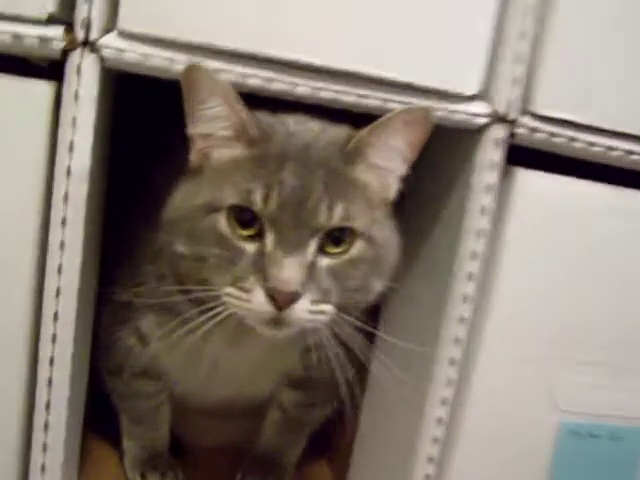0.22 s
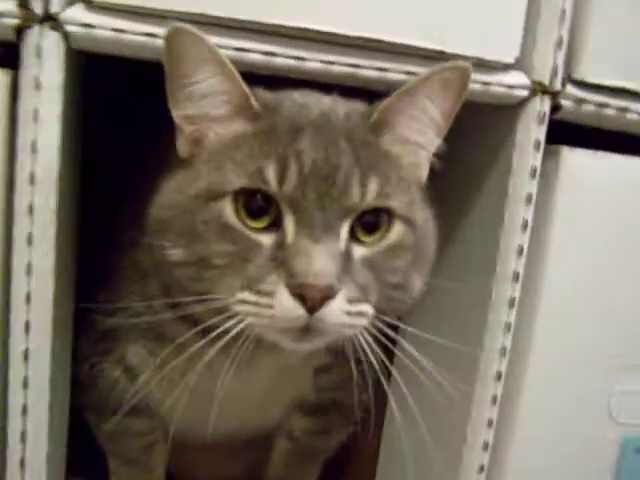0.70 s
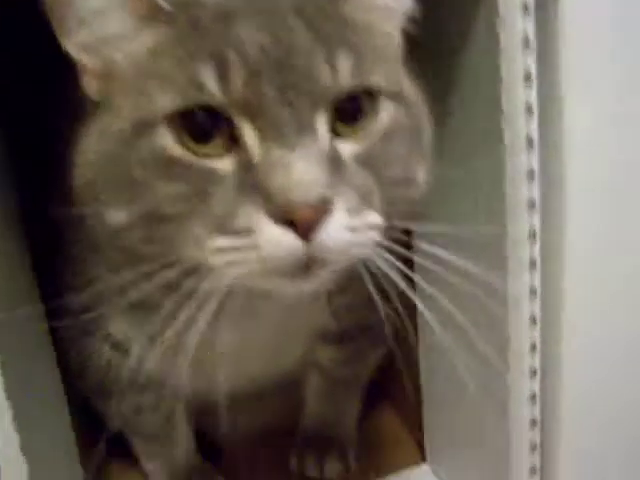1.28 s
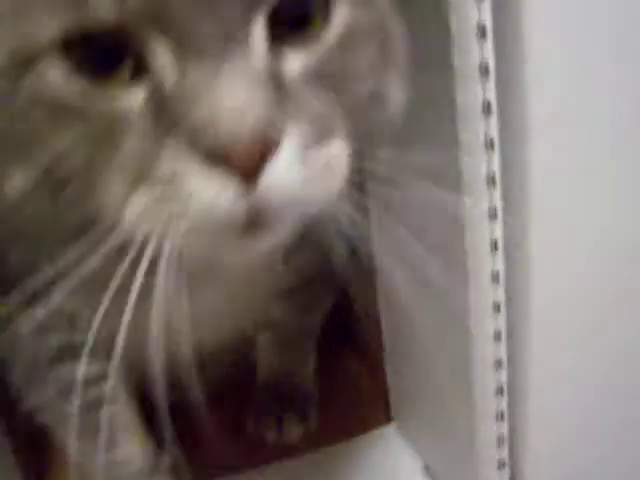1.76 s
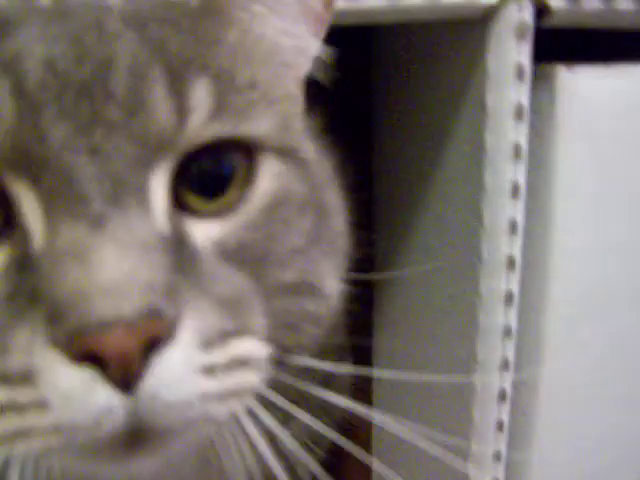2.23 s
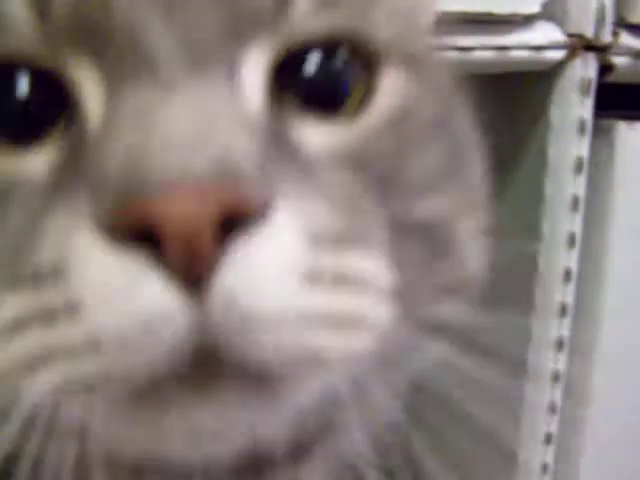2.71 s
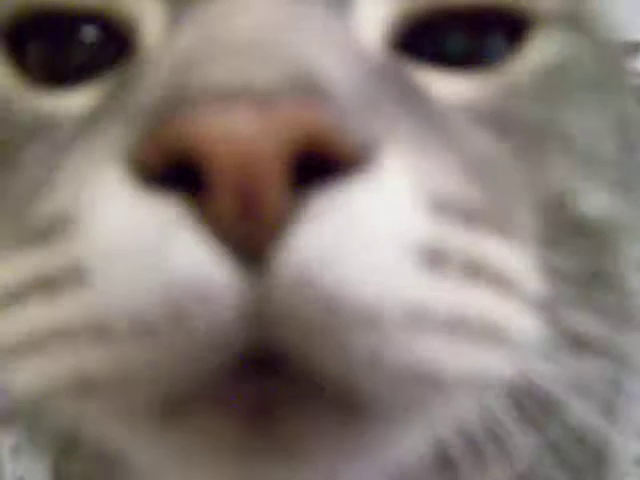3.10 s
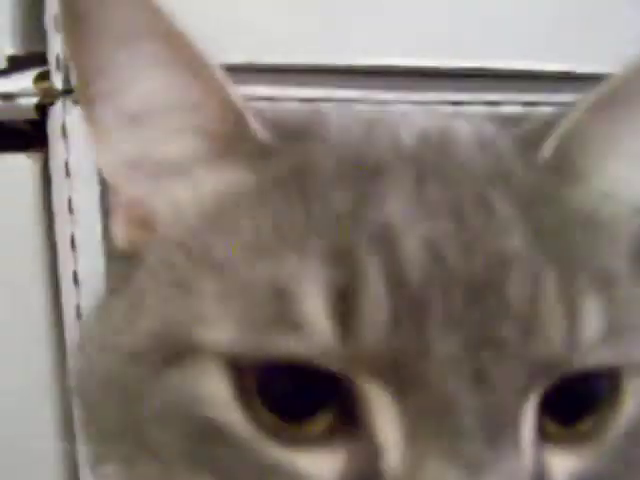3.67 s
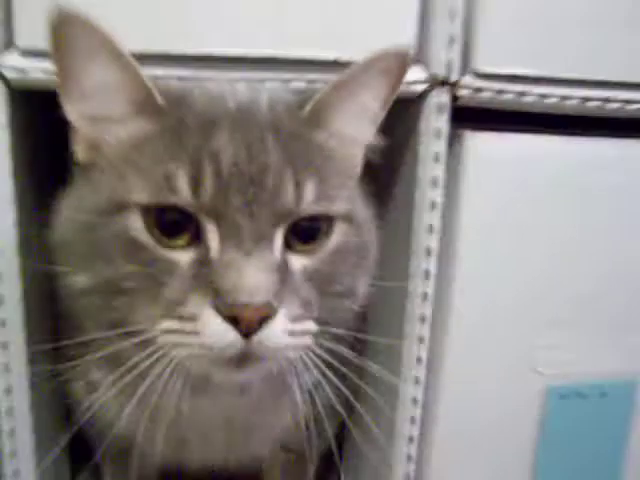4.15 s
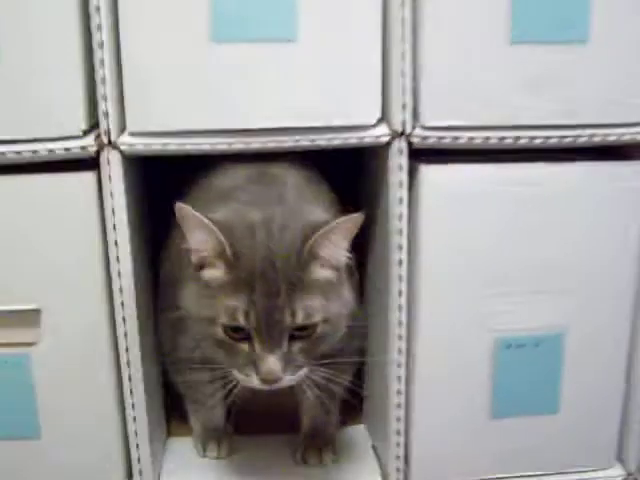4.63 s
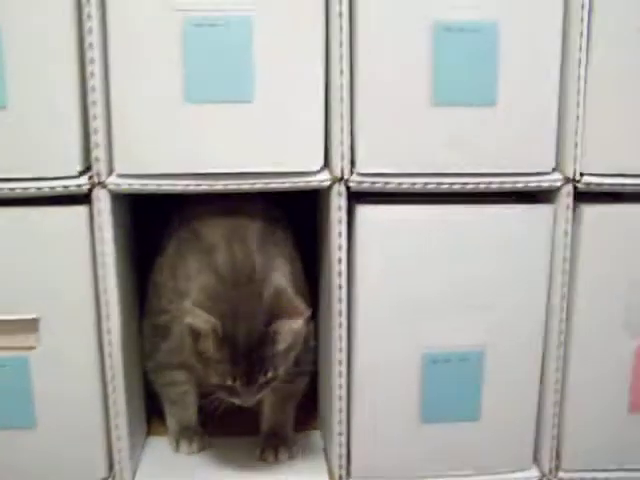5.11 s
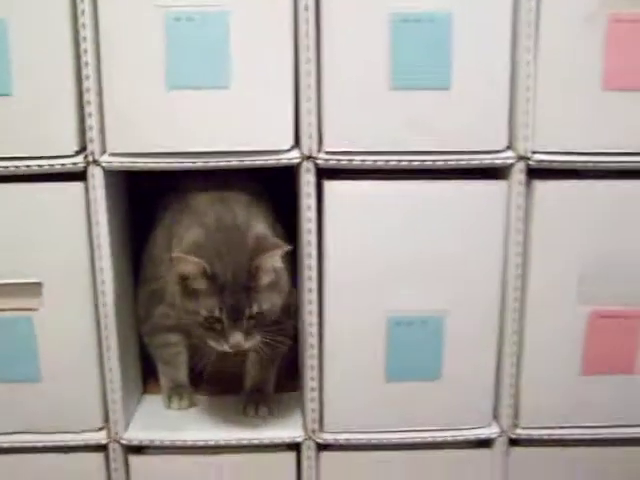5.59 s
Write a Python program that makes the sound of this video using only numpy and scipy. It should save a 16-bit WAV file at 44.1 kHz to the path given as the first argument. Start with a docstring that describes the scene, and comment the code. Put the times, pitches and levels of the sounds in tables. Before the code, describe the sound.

Scattered light taps, knocks and brief scratches on cardboard come from a cat shifting in a box, close to the microphone indoors. A hollow, crackly paw step is followed by a lull, then the cat's side slides softly along the wall and its paws tap and step on the flap. Plastic clicks and bumps from handling the camera break in now and then, with faint hiss and hum underneath.

```python
"""Small room, a stack of cardboard boxes: a cat shifts about in one, close to a hand-held camera.
Paws drive the modes of the floor and front flap; the card crackles and stiff edges knock.
Claws tap and drag, fur swishes, the flank rubs a wall: fibres catch and slip, and the panel booms.
The camera body ticks and bumps in the hand. Faint hum and hiss underneath."""
import sys
import numpy as np
from scipy import signal
from scipy.fft import rfft, irfft
from scipy.io import wavfile

SR = 44100
rng = np.random.default_rng(int(sys.argv[2]) if len(sys.argv) > 2 else 0)


def transcribe(u):
    """Save the signal u as a 16-bit wav file named by the first command-line argument.

    u: samples, shape (n,) or (channels, n), limited to [-1, 1]; the rate is SR.
    q: integer samples, one column per channel.
    """
    v = np.clip(np.atleast_2d(u).T, -1, 1)
    q = np.round(v * 32767).astype(np.int16)
    wavfile.write(sys.argv[1], SR, q)


N = 258822
T = np.arange(N) / SR
AGE = T[:SR // 3]  # time since contact, s

# box wall boom spectrum: f/Hz, level/dB
WALL_BOOM = [(100, -30.5), (170, -2), (230, -8.5), (400, -2), (540, -3), (615, 3), (690, -2), (810, -5),
             (900, -4.5), (1060, -4.5), (1400, -10.5), (2200, -12.5), (5000, -53)]


def undb(db):
    """Decibels to gain."""
    return 10 ** (np.asarray(db) / 20)


def add(out, t_s, x):
    """Mix x in at t_s."""
    i = max(int(t_s * SR), 0)
    out[i:i + len(x)] += x[:max(N - i, 0)]


def colour(x, points, size=2048):
    """Minimum-phase filter through (f/Hz, level/dB) points; keeps white-noise power."""
    hz, db = np.transpose(points)
    bins_hz = np.maximum(np.fft.rfftfreq(size, 1 / SR), 1)
    gain = undb(np.interp(np.log(bins_hz), np.log(hz), db))
    cepstrum = irfft(np.log(gain))
    cepstrum[1:size // 2] *= 2
    cepstrum[size // 2 + 1:] = 0
    response = irfft(np.exp(rfft(cepstrum)))
    return signal.fftconvolve(x, response / np.linalg.norm(response))[:len(x)]


def ring(hz, t60_s):
    """One damped mode."""
    return np.sin(2 * np.pi * hz * AGE) * undb(-60 * AGE / t60_s)


def grains(force, spread_db):
    """Fibres catch and slip: dense, uneven clicks with the energy of the force."""
    sizes = np.repeat(rng.uniform(-1, 1, len(force)), 12)[:len(force)]  # 12 samples a grain
    clicks = force * rng.standard_normal(len(force)) * undb(spread_db * sizes)
    return clicks * np.linalg.norm(force) / np.linalg.norm(clicks)


def room(x, wet_db, box_t60_s=0.13, room_t60_s=0.4, room_db=-6):
    """Direct sound, quick box reflections, fainter room tail; new reflections per call."""
    decay = undb(-60 * AGE / box_t60_s) + undb(room_db) * undb(-60 * AGE / room_t60_s)
    onset = 1 - np.exp(-(AGE / 0.0013) ** 2)
    tail = rng.standard_normal(len(AGE)) * decay * onset
    response = undb(wet_db) * tail / np.linalg.norm(tail)
    response[0] = 1
    return signal.fftconvolve(x, response)[:N]


def paw_steps():
    """A padded paw drives the box modes; the corrugated card crackles as it gives."""
    # f/Hz, t60/s, level struck on floor/dB, level struck on flap/dB
    box_modes = [(164.4, 0.19, -20, -24.5), (189, 0.064, -9, -43.5), (279, 0.095, -4, -7.5),
                 (360, 0.067, 0.5, -35), (416, 0.11, -7, -6.5), (495, 0.2, -12, -19), (507, 0.2, -11, -2),
                 (559, 0.099, -7, 0.5), (601, 0.11, -0.5, -24), (649, 0.052, -22, 2.5),
                 (715, 0.19, -18, -5.5), (825, 0.037, -11, -12), (969, 0.067, 6, 4), (1087, 0.044, -0.5, 2)]
    # t/s, thud/dB, push/s, crackle/dB, crackle decay/s, place (0 floor, 1 flap)
    footfalls = [(1.824, -8.5, 0.00093, -15, 0.0023, 0), (1.8281, -18, 0.0022, -11, 0.002, 0),
                 (5.1146, -11.5, 0.00062, -13.5, 0.0043, 1), (5.582, -17.5, 0.00063, -22.5, 0.012, 1)]
    # f/Hz, level/dB
    crackle_spectrum = [(100, -9), (300, -1.5), (850, 4.5), (1400, -5), (2200, -4.5), (3000, -11),
                        (3900, -3.5), (5000, -21.5), (7000, -35), (8500, -41.5)]
    out = np.zeros(N)
    for t_s, thud_db, push_s, crackle_db, decay_s, on_flap in footfalls:
        # neighbouring mode pairs move the panel in opposite directions
        modes = sum(undb(flap_db if on_flap else floor_db) * ring(hz, t60_s) * (-1) ** (k // 2)
                    for k, (hz, t60_s, floor_db, flap_db) in enumerate(box_modes))
        pad = np.exp(-((AGE - push_s) / (push_s / 2)) ** 2)
        thud = signal.fftconvolve(modes, pad / pad.sum())[:len(AGE)]
        crackle = colour(grains(np.exp(-AGE / decay_s), spread_db=1.0), crackle_spectrum)
        add(out, t_s, undb(thud_db) * room(thud, wet_db=-27.5))
        add(out, t_s, undb(crackle_db) * room(crackle, wet_db=3.5))
    return out


def card_contact(force, rasp_hz, width_oct, boom_db, spread_db):
    """Rasp at the contact plus boom from the whole wall."""
    hz = np.geomspace(50, 12000, 200)
    bell_db = -10 * np.log10(1 + (np.log2(hz / rasp_hz) / width_oct) ** 2)
    # soft card absorbs treble, radiates little bass
    rolloff_db = -10 * np.log10(1 + (hz / 4900) ** 6 + (hz / 6300) ** 14 + (420 / hz) ** 4)
    rasp = colour(grains(force, spread_db), np.c_[hz, bell_db + rolloff_db])
    boom = colour(grains(force, spread_db), WALL_BOOM)
    return rasp + undb(boom_db) * boom


def card_scrapes(release_s=0.017):
    """Scrapes on card: quick claw drags, slow brushing swishes of fur and one thin whistle."""
    # t/s, level/dB, rise/s, hold/s, rasp centre/Hz, rasp width/oct, boom/dB
    scrapes = [(0.208, -38, 0.12, 0.04, 2880, 0.21, -13), (0.3178, -32, 0.00044, 0.01, 2870, 0.55, -13),
               (0.618, -42.5, 0.0051, 0.1, 2490, 0.024, -17), (0.929, -28.5, 0.0004, 0.0031, 2600, 1, -13),
               (1.196, -21.5, 0.013, 0.013, 2200, 0.58, -8), (1.964, -47, 0.0076, 0.22, 3600, 0.91, -19),
               (2.073, -22.5, 0.006, 0.0016, 3050, 0.26, -14), (4.036, -37.5, 0.001, 0.057, 3750, .12, -11),
               (4.1, -23, 0.0011, 0.052, 3500, 0.3, -7.5), (4.734, -50, 0.023, 0.31, 4500, 0.45, -3.5),
               (4.909, -33, 0.0018, 0.013, 2700, 0.48, -3), (5.116, -30, 0.002, 0.025, 2140, 0.44, -1.5),
               (5.605, -34, .004, 0.018, 4700, 0.47, -27), (5.651, -30.5, .0005, 0.012, 4500, 0.65, -22)]
    out = np.zeros(N)
    for t_s, db, rise_s, hold_s, hz, width_oct, boom_db in scrapes:
        attack = np.minimum(AGE / rise_s, 1)
        release = np.exp(-np.maximum(AGE - rise_s - hold_s, 0) / release_s)
        scrape = card_contact(attack * release, hz, width_oct, boom_db, spread_db=9.0)
        add(out, t_s, undb(db) * room(scrape, wet_db=-5.5))
    return out


def claw_taps(touch_s=0.004, ref_width_oct=0.39, ref_db=-38.5, db_per_halving=6.5):
    """Brief touches deep in the box, mostly reflections; firmer taps ring more narrowly."""
    # t/s, level/dB, rasp centre/Hz, boom/dB
    taps = [(0.5258, -45, 1850, 10), (.7767, -44.5, 2700, -6), (1.249, -32, 3040, 1),
            (1.367, -53.5, 1100, 9), (1.4285, -49.5, 1500, 9.5), (1.5005, -49.5, 2000, 15),
            (1.5195, -37.5, 2400, -6), (1.6335, -45, 3770, -22), (1.714, -39.5, 2300, 3.5),
            (2.654, -46, 2500, -3), (3.9862, -39, 3530, -14), (4.2646, -37, 2380, -4),
            (4.3055, -36, 2400, 0), (4.3488, -35.5, 2470, -2.5), (5.0608, -26.5, 3470, -16.5),
            (5.2542, -33.5, 3500, -17), (5.3684, -32.5, 2000, -5.5), (5.4478, -37.5, 950, -1.5),
            (5.505, -34, 2470, -1)]
    out = np.zeros(N)
    touch = np.exp(-AGE / touch_s)
    for t_s, db, hz, boom_db in taps:
        width_oct = ref_width_oct * 2 ** ((ref_db - db) / db_per_halving)
        tap = card_contact(touch, hz, width_oct, boom_db, spread_db=5.5)
        add(out, t_s, undb(db) * room(tap, wet_db=4.5))
    return out


def edge_knocks():
    """A stiff card edge rings briefly on one note; the box reflects it."""
    # t/s, level/dB, f/Hz
    knocks = [(0.3235, -30.5, 948), (0.929, -25, 1860), (1.5195, -26.5, 794), (1.917, -39, 810),
              (2.93, -42.5, 970)]
    out = np.zeros(N)
    for t_s, db, hz in knocks:
        add(out, t_s, undb(db) * room(ring(hz, t60_s=0.057), wet_db=-7.5))
    return out


def flank_rubs(attack_s=0.0087, release_s=0.032, swell_db=3):
    """The flank slides along a wall: the panel booms softly, the fur hisses."""
    # t/s, length/s, boom/dB, hiss/dB
    strokes = [(0.522, 0.44, -43, -50.5), (0.62, 0.15, -54, -37.5), (0.951, 0.092, -40.5, -48),
               (1.086, 0.084, -43.5, -45.5), (2.382, 0.43, -65, -52.5), (2.556, 0.17, -56, -52),
               (3.793, 0.084, -55.5, -52), (4.238, 0.074, -42, -48.5), (4.342, 0.17, -36, -38.5),
               (4.523, 0.14, -39, -43), (4.794, 0.074, -48.5, -54)]
    # f/Hz, level/dB
    fur_spectrum = [(650, -18), (1100, 4.5), (1250, -14), (1310, -0.5), (1540, -2), (1700, -3), (2180, -1),
                    (2480, -1), (3150, 0.5), (3400, -1.5), (3870, 2), (6300, -20.5), (8500, -31.5),
                    (11000, -68.5), (18700, -120)]
    boom_force, hiss_force = np.zeros(N), np.zeros(N)
    for t_s, length_s, boom_db, hiss_db in strokes:
        attack = np.clip((T - t_s) / attack_s, 0, 1)
        release = np.exp(-np.maximum(T - t_s - length_s, 0) / release_s)
        lean = np.sin(np.pi * np.clip((T - t_s) / length_s, 0, 1))  # hardest in mid-stroke
        force = attack * release * undb(swell_db * (lean - 1.5))
        boom_force = np.hypot(boom_force, undb(boom_db) * force)
        hiss_force = np.hypot(hiss_force, undb(hiss_db) * force)
    boom = colour(grains(boom_force, spread_db=10), WALL_BOOM)
    hiss = colour(grains(hiss_force, spread_db=12), fur_spectrum)
    return room(boom + hiss, wet_db=-4.5)


def camera_handling(snap_decay_s=0.0011, bump_rise_s=0.0009):
    """Dry plastic ticks and dull bumps of the camera body, right at the microphone."""
    # t/s, level/dB, f/Hz, t60/s, snap/dB
    ticks = [(0.4104, -23.5, 1600, .01, 3.5), (0.4137, -17, 2830, 0.012, -0.5),
             (1.9725, -15, 3890, 0.011, -9), (1.982, -30, 5160, .006, -3),
             (2.927, -26.5, 3970, 0.0053, -19), (4.1562, -14.5, 890, 0.012, 3.5),
             (5.5562, -18, 2760, 0.02, -3)]
    # f/Hz, level/dB
    snap_spectrum = [(60, -17), (200, -6), (500, 5), (1500, 9.5), (4800, 6.5), (7000, -27), (8500, -66)]
    # t/s, level/dB, f/Hz, t60/s
    bumps = [(0.4127, -17.5, 111, 0.0091), (0.531, -25, 298, 0.02), (0.778, -22.5, 130, 0.03),
             (0.933, -28.5, 336, 0.092), (1.972, -33.5, 375, 0.11), (3.861, -27, 222, 0.03),
             (3.877, -31, 164, 0.046), (5.451, -16, 235, 0.016), (5.471, -28.5, 141, 0.12)]
    out = np.zeros(N)
    for t_s, db, hz, t60_s, snap_db in ticks:
        snap = colour(rng.standard_normal(len(AGE)) * np.exp(-AGE / snap_decay_s), snap_spectrum)
        add(out, t_s, undb(db) * (ring(hz, t60_s) + undb(snap_db) * snap))
    for t_s, db, hz, t60_s in bumps:
        add(out, t_s, undb(db) * ring(hz, t60_s) * (1 - np.exp(-AGE / bump_rise_s)))
    return out


def background(hiss_db=-47.5, hum_far_db=-4, approach_s=1.5, away_s=4.16, move_s=0.28):
    """Even room and microphone hiss; a wavering hum, louder with the camera near the box."""
    # f/Hz, level when near/dB
    hum_lines = [(56, -67), (198, -72), (316, -54.5), (340, -62), (736, -67.5), (1320, -68.5), (2143, -68),
                 (3354, -74)]
    # f/Hz, level/dB
    hiss_spectrum = [(25, 9), (60, -4), (160, 0), (300, -5), (500, -8.5), (1000, -9), (1600, -10.5),
                     (3000, -13.5), (4300, -9.5), (4800, -18.5), (7000, -22.5), (8000, -26.5), (8800, -36)]
    hum = np.zeros(N)
    for hz, db in hum_lines:
        drift_rad = 0.96 * np.interp(T, np.linspace(0, T[-1], 30), rng.standard_normal(30))
        hum += undb(db) * np.sqrt(2) * np.sin(2 * np.pi * hz * T + drift_rad)
    hiss = undb(hiss_db) * colour(rng.standard_normal(N), hiss_spectrum, size=8192)
    near = np.clip(np.minimum(T - approach_s, away_s - T) / move_s, 0, 1)
    return hiss + hum * undb(hum_far_db * (1 - near))


def scene():
    """Cat, hand and room; mono."""
    cat = paw_steps() + card_scrapes() + claw_taps() + edge_knocks() + flank_rubs()
    return (cat + camera_handling() + background())[None]


def record(dry, low_hz=55, rolloff_hz=7900, top_hz=8500):
    """Camera passband: deep bass thinned, upper treble cut steeply."""
    thin = signal.sosfilt(signal.butter(2, low_hz, "high", fs=SR, output="sos"), dry)
    soft = signal.sosfilt(signal.butter(10, rolloff_hz, fs=SR, output="sos"), thin)
    return signal.sosfilt(signal.ellip(8, .2, 70, top_hz, fs=SR, output="sos"), soft)


dry = scene()
out = record(dry)
transcribe(out)
```